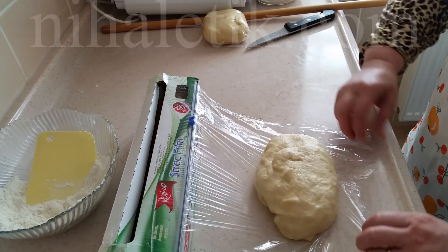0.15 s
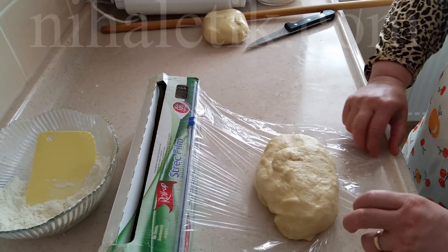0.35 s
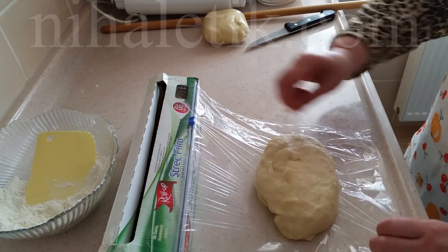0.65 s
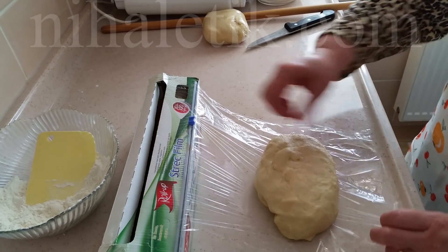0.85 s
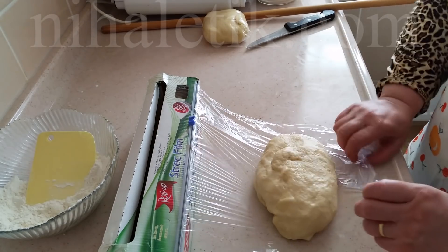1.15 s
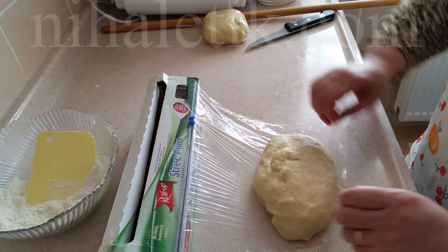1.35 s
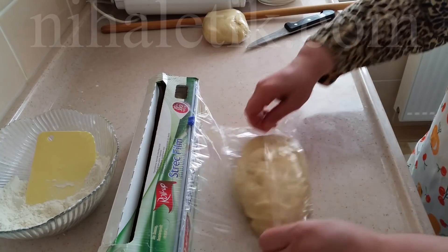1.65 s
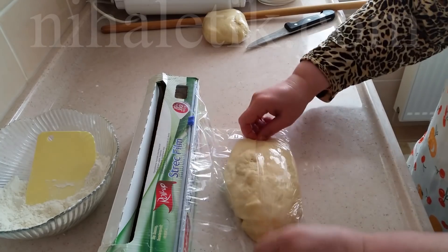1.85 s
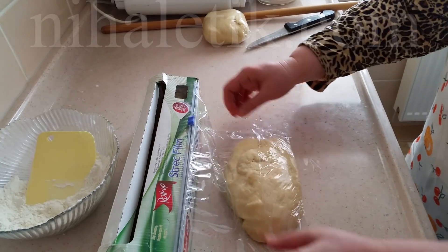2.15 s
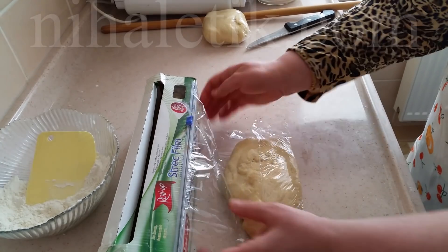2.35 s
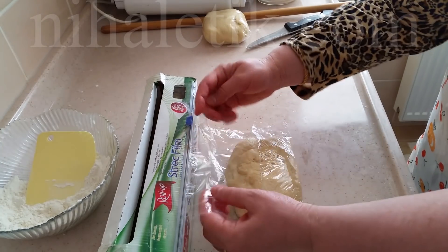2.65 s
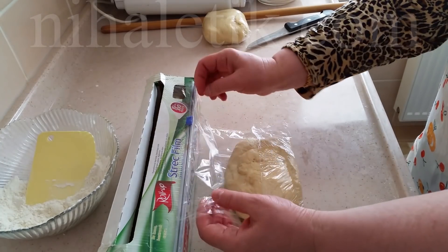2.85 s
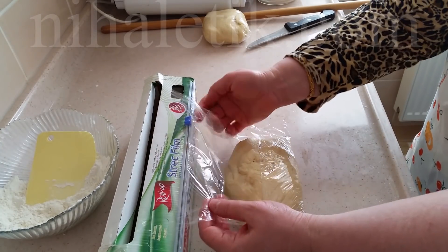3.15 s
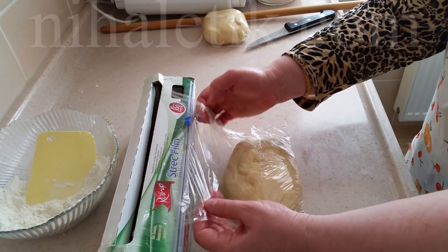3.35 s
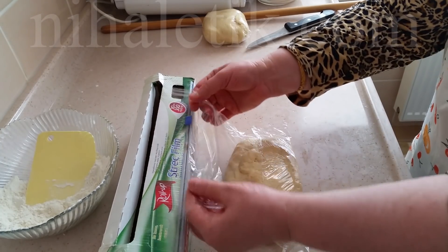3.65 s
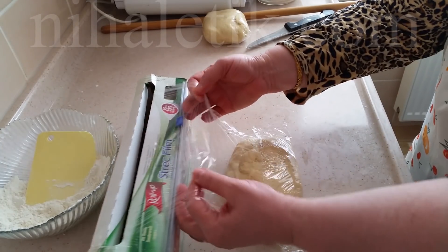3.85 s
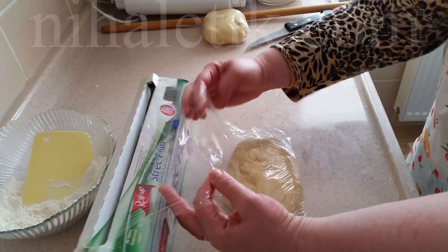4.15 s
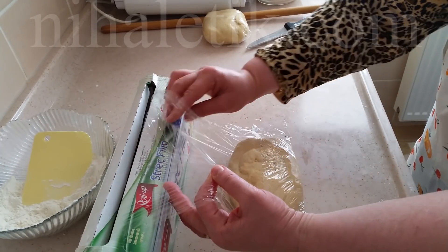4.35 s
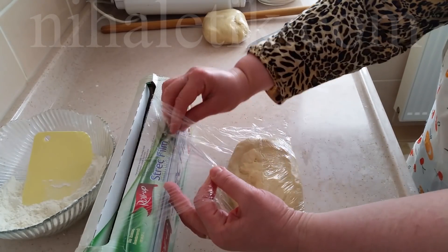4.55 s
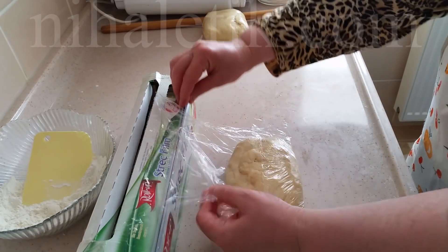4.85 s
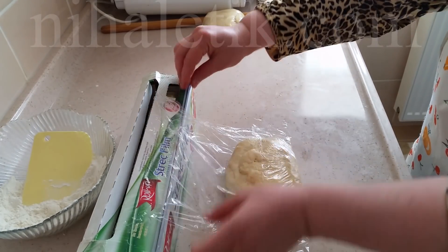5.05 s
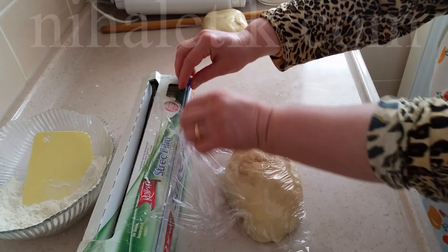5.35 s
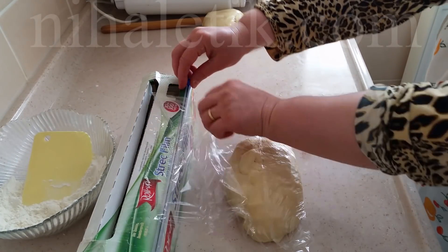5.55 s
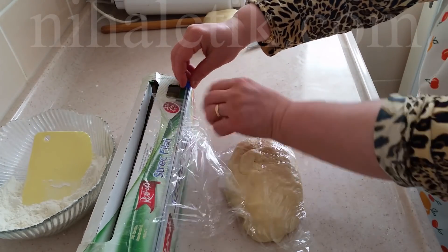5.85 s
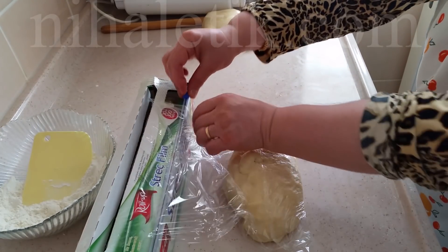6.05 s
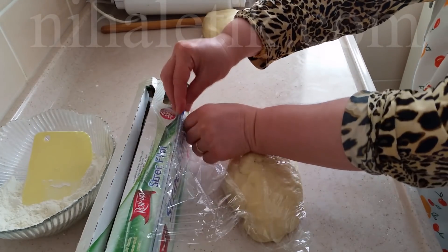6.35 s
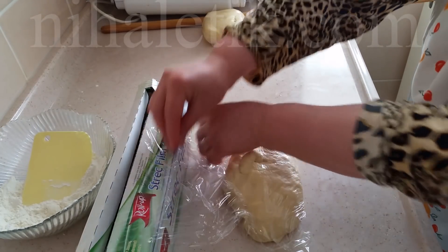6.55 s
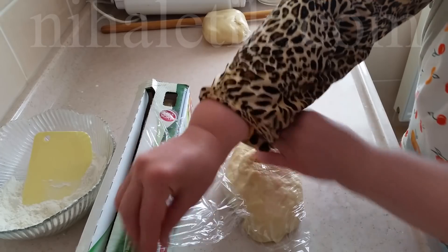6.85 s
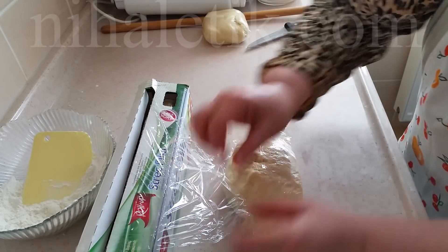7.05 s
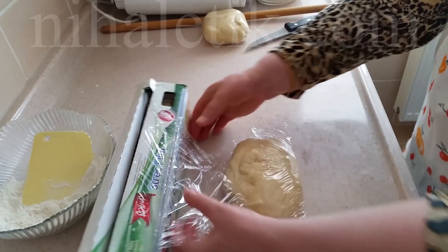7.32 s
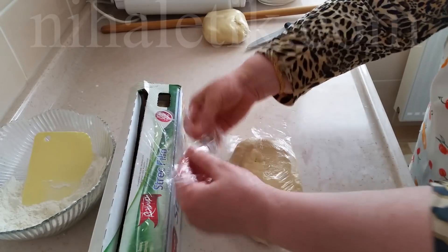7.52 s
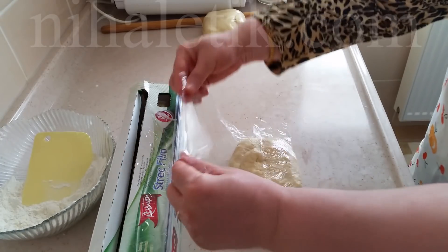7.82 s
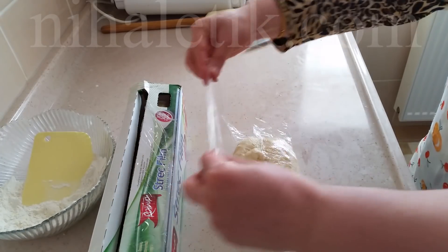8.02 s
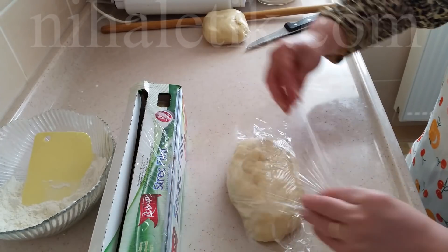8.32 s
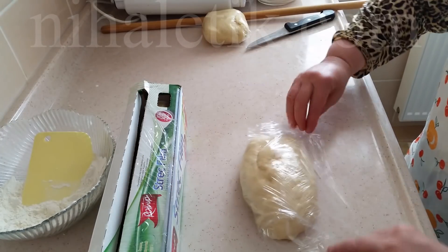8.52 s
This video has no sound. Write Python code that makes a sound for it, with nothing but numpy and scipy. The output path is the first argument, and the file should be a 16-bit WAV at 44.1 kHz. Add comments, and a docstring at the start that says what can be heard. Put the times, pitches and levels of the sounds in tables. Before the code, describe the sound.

In a small kitchen, close microphones pick up thin plastic wrap crinkling in uneven bursts over a steady low rumble and hiss. Its cardboard box taps and slips on the counter, knocking loudest about halfway through, while hands and dough rub and land softly. The crackle grows busier, a plastic slider gives a quick rasp, and a cluster of crisp snaps comes as the film is folded over the dough.

```python
"""A faint crackle of cling film comes first, close by on a kitchen counter, over low rumble and hiss.
The film is pulled from its cardboard box, cut and folded round a lump of dough: creases buckle in
clumps of tiny clicks with a few sharp snaps. The box is nudged; box and dough rub; hands and dough thud
softly on the counter. Small room, two unlike microphones close in, the left one hissing more."""
import sys
import numpy as np
from scipy import signal
from scipy.fft import rfft, irfft
from scipy.io import wavfile
from scipy.ndimage import uniform_filter1d

SR = 44100
rng = np.random.default_rng(int(sys.argv[2]) if len(sys.argv) > 2 else 0)


def to_wav(s):
    """Save 16-bit WAV."""
    ch = np.atleast_2d(s).T  # columns
    pcm = np.round(np.clip(ch, -1, 1) * 32767)  # PCM
    wavfile.write(sys.argv[1], SR, pcm.astype(np.int16))


N = 382684
TIME = np.arange(N) / SR
ROOM_T60_S, TREBLE_T60_S = 0.51, 0.68   # decay of the kitchen for the box and for the film's treble


def from_db(db):
    """Decibels to gain."""
    return 10 ** (np.asarray(db) / 20)


def unit_rms(x):
    """Scale to rms 1."""
    return x / np.sqrt(np.mean(x ** 2) + 1e-20)


def unit_peak(x, size):
    """Scale so that the loudest stretch of size samples has rms 1."""
    power = np.mean(np.atleast_2d(x) ** 2, axis=0)
    return x / np.sqrt(uniform_filter1d(power, size).max() + 1e-20)


def at_bins(points, size):
    """Read a table on a log-frequency axis at the bins of an FFT of this size."""
    hz, value = np.transpose(points)
    return np.interp(np.log(np.fft.rfftfreq(size, 1 / SR) + 1e-3), np.log(hz), value)


def decay(t60, size):
    """An exponential fall of 60 dB in t60 seconds."""
    return from_db(-60 * TIME[:size] / max(t60, 1e-4))


def convolve(x, response):
    """Convolve, keeping the length."""
    return signal.fftconvolve(np.atleast_2d(x), np.atleast_2d(response), axes=-1)[:, :x.shape[-1]]


def colour(x, spectrum, size=4096):
    """Causal (minimum-phase) filter with the given spectrum."""
    cepstrum = irfft(np.log(from_db(at_bins(spectrum, size))))
    cepstrum[1:size // 2] *= 2
    cepstrum[size // 2 + 1:] = 0
    return convolve(x, irfft(np.exp(rfft(cepstrum))))


def drift(per_s):
    """A random wander of rms 1, with per_s new values a second."""
    knots = rng.standard_normal(N)
    return unit_rms(np.interp(TIME * per_s, np.arange(N), knots))


def grains(per_s, spread_db):
    """Random clicks of uneven size, evened to a steady mean power."""
    sizes = from_db(spread_db * np.minimum(rng.exponential(1, N), 4)) * rng.choice([-1, 1], N)
    fires = rng.random(N) < per_s / SR
    return unit_rms(sizes * fires / np.sqrt(per_s))


def add(out, start_s, sound):
    """Mix a sound in at start_s."""
    start = max(int(start_s * SR), 0)
    out[:, start:start + sound.shape[-1]] += sound[..., :N - start]


# Likeness of the room's sound at the two microphones: f/Hz, coherence
PAIR_COHERENCE = [(60, 1), (130, 0.77), (290, 0.67), (640, 0.3), (1400, 0.036)]
def diffuse(size):
    """Noise from all round the pair, alike in the bass and unrelated in the treble."""
    mid, side = rfft(rng.standard_normal((2, size)))
    alike = np.clip(at_bins(PAIR_COHERENCE, size), 0, 1)
    return unit_rms(irfft(np.sqrt(1 + alike) * mid + np.sqrt(1 - alike) * side * [[1], [-1]], size))


def kitchen(near_db, near_t60, tail_db, tail_t60, size=16384):
    """From one spot to the pair: direct sound, quick scatter off counter and hands, the room's tail."""
    near = unit_rms(diffuse(size) * decay(near_t60, size))
    tail = unit_rms(diffuse(size) * decay(tail_t60, size))
    response = (from_db(near_db) * near + from_db(tail_db) * tail) / np.sqrt(size)
    response[0, 0] += 1
    response[1, rng.integers(4, 10)] += 1   # direct sound reaches the right microphone later
    return response / np.sqrt(np.sum(response ** 2) / 2)


# Room tone of the kitchen: f/Hz, level/dB
RUMBLE_SPECTRUM = [(20, -33), (40, -30.5), (62, -8.5), (80, -12), (103, 0.5), (140, -11.5), (300, -16.5),
                   (500, -19.5), (900, -31), (1800, -42.5), (6000, -59.5)]
def room_rumble(level_db=-57):
    """A low steady rumble all round the microphones."""
    return from_db(level_db) * unit_rms(colour(diffuse(N), RUMBLE_SPECTRUM))


# Microphone hiss, with two resonant humps: f/Hz, level/dB
HISS_SPECTRUM = [(1900, -37.5), (2350, -14.5), (2780, 2.5), (3150, -6.5), (3560, 6.5), (4100, -2),
                 (5000, -25.5), (11500, -83.5), (14000, -16)]
# Its course at the left microphone, before the swell: t/s, level/dB
HISS_LEVELS = [(2.05, -56), (2.25, -59.5), (8.0, -58.5)]
def microphone_hiss(effort_db, right_db=-9, swell=0.19):
    """Each microphone has its own hiss, which swells a little while the film is worked."""
    busy_db = uniform_filter1d(effort_db, size=8820)
    level_db = np.interp(TIME, *np.transpose(HISS_LEVELS)) + swell * (busy_db - busy_db.mean())
    hiss = unit_rms(colour(rng.standard_normal((2, N)), HISS_SPECTRUM))
    return from_db(level_db) * hiss * from_db([[0], [right_db]])


# Low modes of the counter: f/Hz, level/dB
COUNTER_MODES = [(68, 0), (97, 1), (128, -2)]
# Hands and dough landing near the microphones: t/s, relative level/dB
THUDS = [(1.158, -44.5), (1.801, -47), (3.794, -40), (4.192, -37), (6.036, -36), (6.519, -42.5),
         (7.381, -47), (8.64, -39.5)]
def counter_thuds(level_db=1, t60=0.32, attack_s=0.02, size=16384):
    """Soft weight sets the low modes of the counter going."""
    out, t = np.zeros((2, N)), TIME[:size]
    for start_s, db in THUDS:
        swing = sum(from_db(mode_db) * np.sin(2 * np.pi * (hz * t + rng.random()))
                    for hz, mode_db in COUNTER_MODES)
        thud = swing * decay(t60, size) * (1 - decay(attack_s, size)) ** 2
        add(out, start_s, from_db(db + level_db) * unit_peak(thud, size=352))
    return out


# Modes of the box standing on the counter: f/Hz, level/dB, t60/s
BOX_MODES = [(175.4, -3.5, 0.19), (213.4, 2.5, 0.053), (284.2, -10, 0.28), (332, -13.5, 0.05),
             (392.7, -1.5, 0.091), (481.5, -5, 0.19), (593, 0, 0.052), (802, 0.5, 0.076), (901, 3, 0.047),
             (1228, -6, 0.09)]
# Dead sound of its cardboard, close up: f/Hz, level/dB
CARDBOARD_SPECTRUM = [(25, -64.5), (55, -5), (160, 1), (370, 6.5), (520, -14), (800, -6), (1400, -16),
                      (2400, -24.5), (4000, -36), (6000, -83)]
def box(force, ring_db):
    """The cardboard answers a force with a dead broad sound and its ringing modes."""
    size = force.shape[-1]
    modes = sum(from_db(db) * rng.choice([-1, 1]) * np.sin(2 * np.pi * hz * TIME[:size])
                * decay(t60, size) for hz, db, t60 in BOX_MODES)
    dead = unit_rms(colour(force, CARDBOARD_SPECTRUM))
    return dead + from_db(ring_db) * unit_rms(convolve(force, modes))


# Hard midrange tick, also heard in the cutter and the snaps: f/Hz, level/dB
TICK_SPECTRUM = [(300, -54), (900, 4.5), (1500, 7.5), (2250, 8.5), (3000, 0.5), (4000, 1), (5500, -26),
                 (9000, -15.5)]
# Knocks and slips of the box on the counter: t/s, relative level/dB, tick offset/dB
KNOCKS = [(2.364, -41.5, -14.5), (2.499, -41, -17), (2.572, -37.5, -11), (3.008, -40.5, -12),
          (3.14, -43, -22), (3.98, -36.5, -20), (4.06, -33.5, -9.5), (4.157, -21.5, -20),
          (4.169, -18.5, -41), (4.183, -19, -38), (4.23, -30.5, -38), (4.336, -31, -9), (4.566, -40.5, -7),
          (5.188, -46.5, -9.5), (5.656, -43.5, -13), (6.032, -24.5, -10), (6.058, -33.5, -15),
          (6.227, -43, -12), (6.338, -37, -25), (6.965, -36.5, -14), (7.381, -36, -35), (7.395, -33.5, -38),
          (7.61, -39, -20)]
def box_knocks(body_db=-1, tick_db=2, ring_db=-5, ring_slope=0.35, usual_db=-35.5, size=16384):
    """The box is tapped or slips: a hard tick on a hollow body that rings more for harder knocks."""
    out = np.zeros((2, N))
    for start_s, db, hard_db in KNOCKS:
        force = kitchen(near_db=6, near_t60=0.065, tail_db=1, tail_t60=ROOM_T60_S)
        hollow = box(force, ring_db + ring_slope * (db - usual_db))
        body = from_db(body_db) * unit_peak(hollow, size=352)
        tick = from_db(tick_db + hard_db) * unit_peak(colour(force, TICK_SPECTRUM), size=352)
        add(out, start_s, from_db(db) * (body + tick))
    return out


def stroke_power(start_s, length_s, db, growth_db=0):
    """Power of one hand movement: it sets in, grows or eases while it lasts, lets go and settles."""
    attack_db_per_s, release_db_per_s = 256, 326
    settle_db, settle_db_per_s = -14.5, 72   # a quiet tail lingers in the room after each movement
    progress = np.clip((TIME - start_s) / max(length_s, 1e-3), 0, 1)
    before_s, after_s = np.maximum(start_s - TIME, 0), np.maximum(TIME - start_s - length_s, 0)
    held_db = db + growth_db * (progress - 0.5)
    ending_db = np.maximum(-release_db_per_s * after_s, settle_db - settle_db_per_s * after_s)
    return from_db(np.maximum(held_db - attack_db_per_s * before_s + ending_db, -140)) ** 2


def scraping(per_s):
    """Dense uneven slips, close by with the room behind them."""
    slips = grains(per_s, spread_db=2.8) * from_db(2 * drift(per_s=60))
    return convolve(slips, kitchen(near_db=0.5, near_t60=0.03, tail_db=-3.5, tail_t60=ROOM_T60_S))


def cutter(start_s=6.98, length_s=0.064, level_db=-46.5, box_db=3):
    """The plastic slider rasps as it reaches the end of its rail, and shakes the box."""
    slips = scraping(per_s=500)
    rasp = unit_rms(colour(slips, TICK_SPECTRUM))
    shake = from_db(box_db) * unit_rms(box(slips, ring_db=3))
    return np.sqrt(stroke_power(start_s, length_s, level_db)) * (rasp + shake)


# Hands pull, lift or fold the film at the counter, driving both rub and crackle:
# t/s, length/s, relative crackle level/dB, crackle growth/dB, relative rub level/dB
HAND_STROKES = [(0.0, 0.21, -67, 3.5, -64), (1.229, 0.31, -58, 12.5, -65.5), (1.95, 0.1, -61.5, 0.5, -66),
                (2.434, .16, -66, 4.5, -52.5), (2.652, 0.2, -67, 12, -62.5),
                (3.007, 0.25, -60.5, 16.5, -52), (3.31, 0.38, -63, -2.5, -59),
                (3.765, 0.43, -48, -0.5, -47), (4.215, 0.22, -51.5, -8, -50),
                (4.513, 0.26, -67, -16, -59.5), (4.781, 0.35, -59, 11.5, -56), (5.504, .15, -53.5, 8, -57),
                (6.038, 0.038, -48, 3.5, -53), (6.234, 0.12, -59.5, 3, -54.5), (6.535, 0.26, -43, 5.5, -45),
                (6.878, 0.065, -43, 0, -45.5), (7.433, 0.17, -49, 15.5, -47.5),
                (7.625, 0.2, -45.5, 4.5, -55), (7.946, 0.076, -51, -3, -52), (8.203, .2, -77, -8, -69),
                (8.594, 0.023, -52.5, 3, -59)]
def dull_rub(level_db=1, growth_share=0.23):
    """Dull rubbing during each hand stroke, from the box or dough on the counter."""
    judder = unit_rms(box(scraping(per_s=900), ring_db=-11))
    power = sum(stroke_power(start_s, length_s, rub_db, growth_share * growth_db)
                for start_s, length_s, _, growth_db, rub_db in HAND_STROKES)
    return from_db(level_db) * np.sqrt(power) * judder


def hand_effort(rest_db=-93, flutter_db=0.78, flutter_per_s=14):
    """How hard the uneven pull of the hands works the film, in dB; at rest it barely crackles."""
    power = sum(stroke_power(start_s, length_s, crackle_db, growth_db)
                for start_s, length_s, crackle_db, growth_db, _ in HAND_STROKES)
    return 10 * np.log10(power + from_db(rest_db) ** 2) + flutter_db * drift(flutter_per_s)


# Clicks of the film, close to the microphones: f/Hz, level/dB
FILM_SPECTRUM = [(200, -3.5), (900, -12.5), (2000, -12.5), (3000, -11), (3800, -13), (5000, -22.5),
                 (6200, -30.5), (7400, -22.5), (9000, -5), (12500, -3), (15400, -1.5)]
def film_crackle(effort_db, level_db=6, clicks_per_s=750, rate_slope=0.15, usual_db=-55, spots=3):
    """Working the film harder buckles more creases; they give way in clumps at several spots."""
    per_s = clicks_per_s * from_db(rate_slope * (effort_db - usual_db))
    at_pair = np.zeros((2, N))
    for _ in range(spots):
        clumps = grains(per_s, spread_db=4.2) * from_db(3.4 * drift(per_s=100))
        path = kitchen(near_db=0, near_t60=0.025, tail_db=-4, tail_t60=TREBLE_T60_S)
        at_pair += convolve(clumps, path)
    return from_db(effort_db + level_db) * unit_rms(colour(at_pair, FILM_SPECTRUM))


# Tilt that makes a snap thinner than the crackle: f/Hz, level/dB
SNAP_TILT = [(2500, -8), (9000, -4.5)]
# Sharp snaps close by, from film creases and the click of the cutter stopping:
# t/s, relative level/dB, midrange offset/dB
SNAPS = [(.189, -47.5, -21), (1.3373, -35.5, -28), (1.4697, -36.5, -33), (1.5084, -31.5, -9),
         (2.841, -45, -22), (3.3812, -41, -30), (3.7227, -39.5, -44), (5.597, -44.5, -28),
         (6.2614, -33.5, -28), (6.7873, -33, -36), (6.8883, -30.5, -36), (7.012, -44, -6),
         (7.6629, -30, -31), (7.6919, -19, -46), (7.7757, -36.5, -3), (7.794, -28, -36), (7.8066, -27, -23),
         (7.946, -25, -17.5), (7.966, -30, -7.5), (8.496, -60, 8), (8.603, -39, -11)]
def sharp_snaps(crack_db=5, body_db=-5, run_t60=0.018, run_slope=0.37, size=16384):
    """A crease lets go or the cutter stops: a short burst that runs longer the more body it has."""
    out = np.zeros((2, N))
    for start_s, db, mid_db in SNAPS:
        t60 = run_t60 * from_db(run_slope * mid_db)
        burst = rng.standard_normal(size) * decay(t60, size) * (1 - decay(t60 / 2, size))
        path = kitchen(near_db=-4, near_t60=0.035, tail_db=-13, tail_t60=TREBLE_T60_S)
        at_pair = convolve(burst, path)
        treble = colour(colour(at_pair, FILM_SPECTRUM), SNAP_TILT)
        crack = from_db(crack_db) * unit_peak(treble, size=176)
        body = from_db(body_db + mid_db) * unit_peak(colour(at_pair, TICK_SPECTRUM), size=176)
        add(out, start_s, from_db(db) * (crack + body))
    return out


def scene():
    """Film, box and counter close to the pair, over room tone and hiss."""
    effort_db = hand_effort()
    clicks = film_crackle(effort_db) + sharp_snaps()
    handling = box_knocks() + dull_rub() + cutter() + counter_thuds()
    return clicks + handling + room_rumble() + microphone_hiss(effort_db)


# Right microphone against the left: f/Hz, level/dB
RIGHT_MIC_RESPONSE = [(100, 0.5), (1100, -4), (2000, -2.5), (3700, -5), (6000, 2), (7400, -4),
                      (9000, -19.5), (10300, -12.5), (12000, -9), (14000, 2.5)]
def record(dry, cutoff_hz=15750):
    """The right microphone is duller; both channels lose the very top."""
    pair = np.vstack([dry[0], colour(dry[1], RIGHT_MIC_RESPONSE)[0]])
    return signal.sosfilt(signal.ellip(10, 0.2, 70, cutoff_hz, fs=SR, output="sos"), pair)


dry = scene()
out = record(dry)
to_wav(out)
```